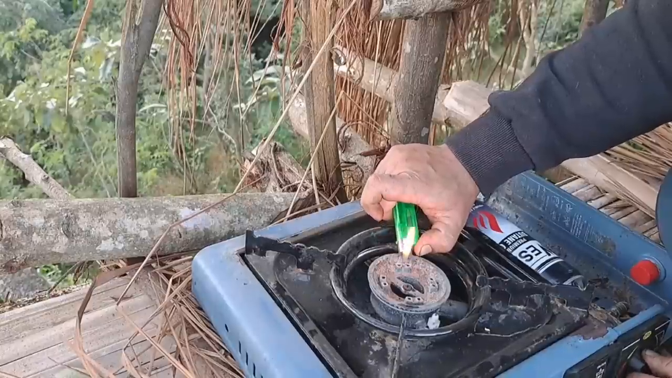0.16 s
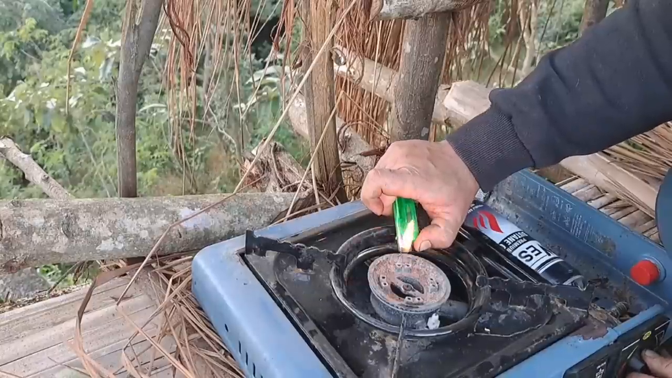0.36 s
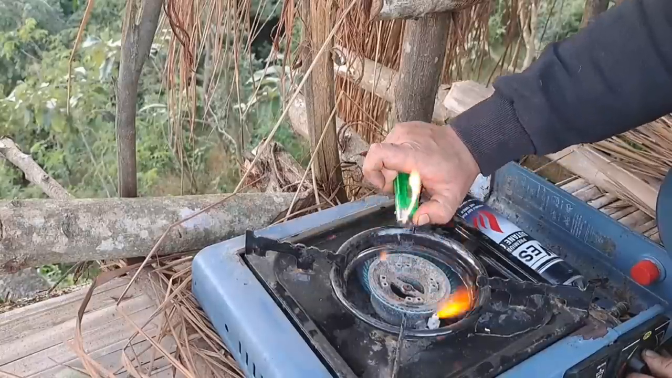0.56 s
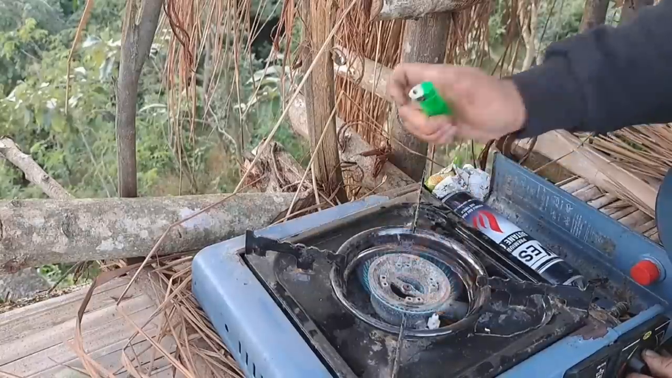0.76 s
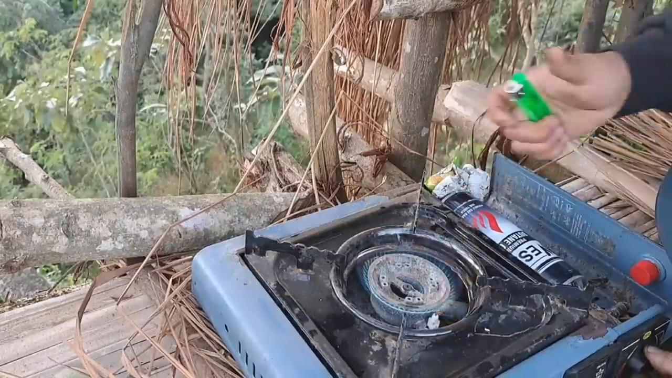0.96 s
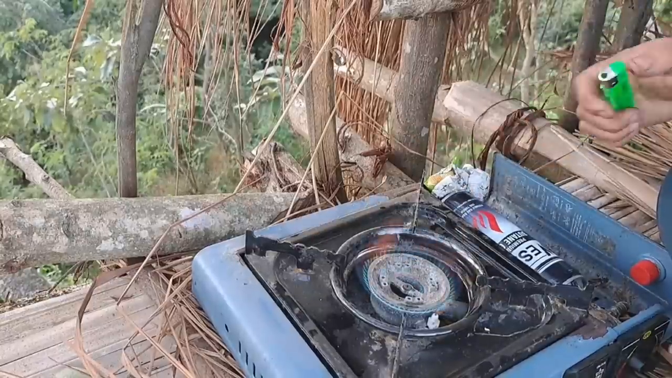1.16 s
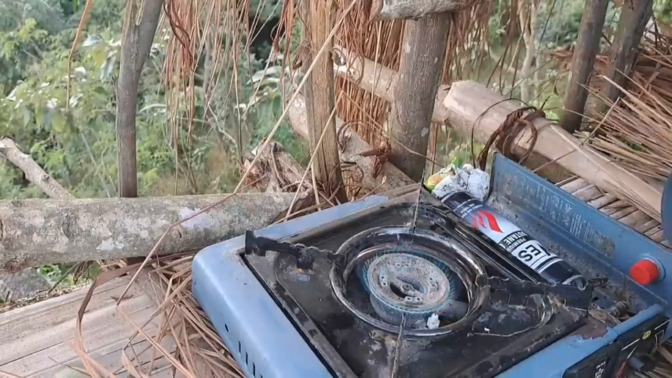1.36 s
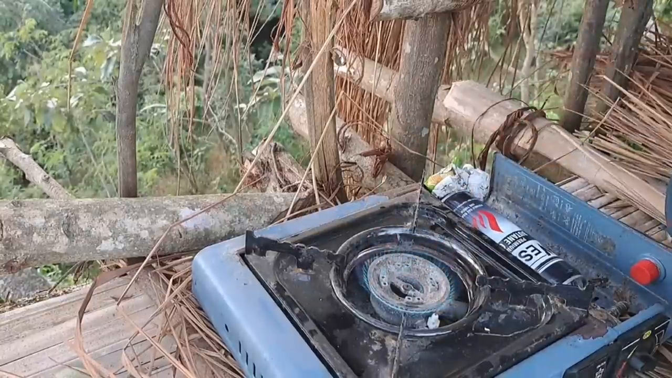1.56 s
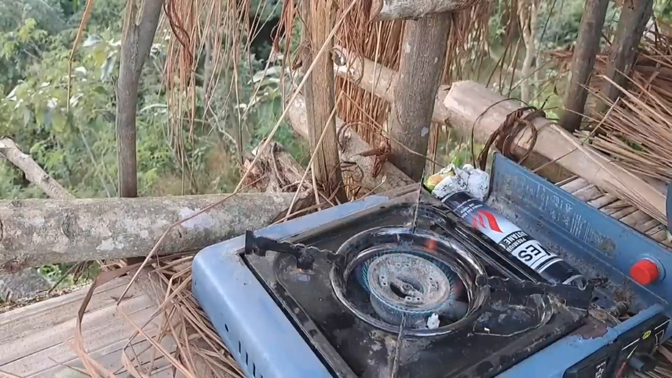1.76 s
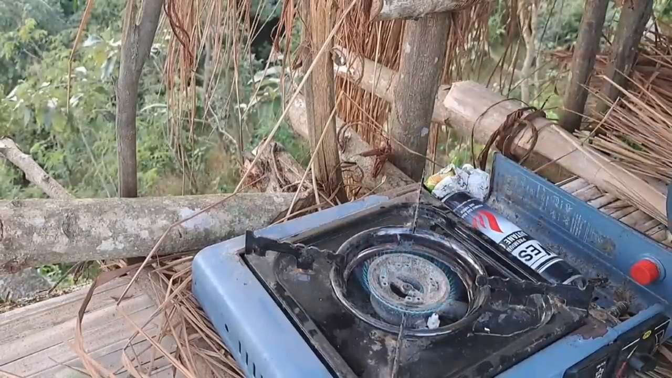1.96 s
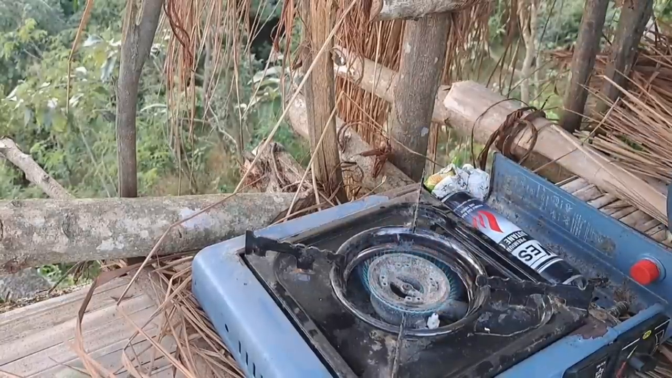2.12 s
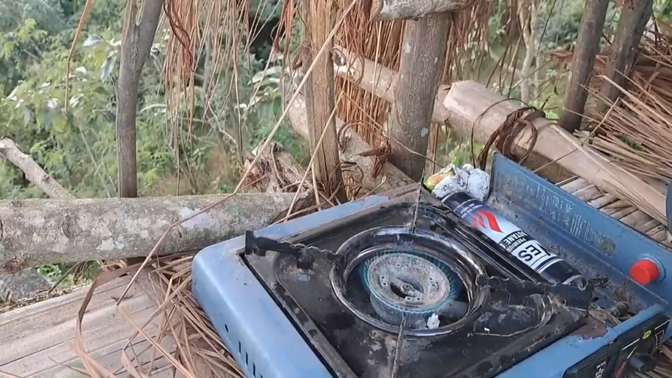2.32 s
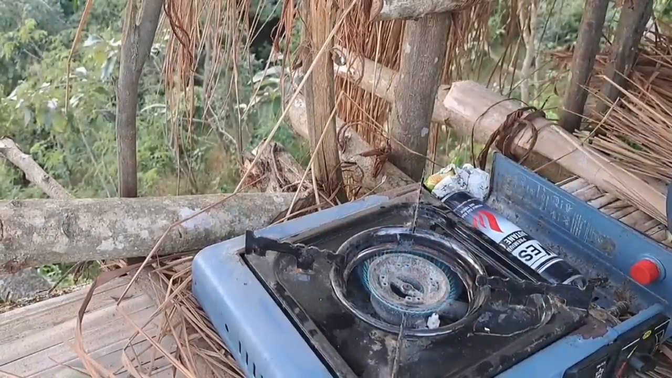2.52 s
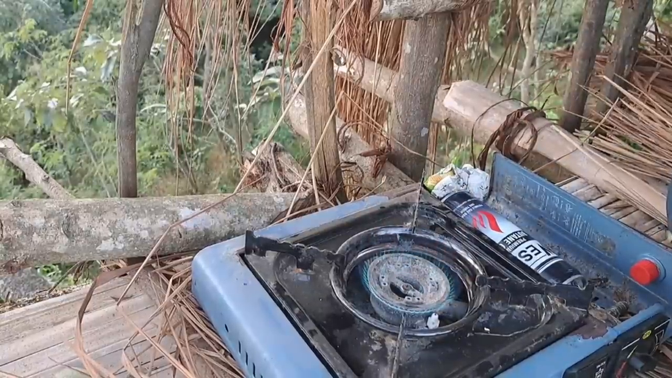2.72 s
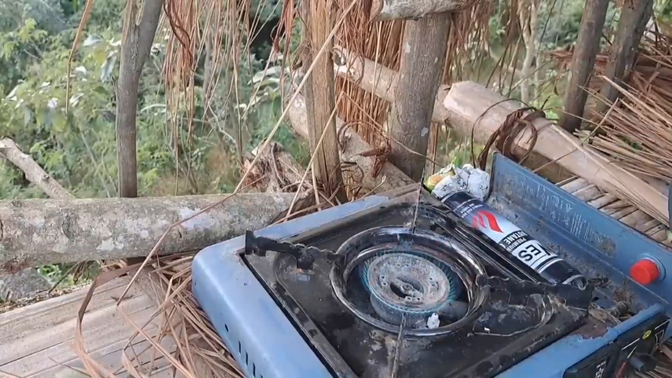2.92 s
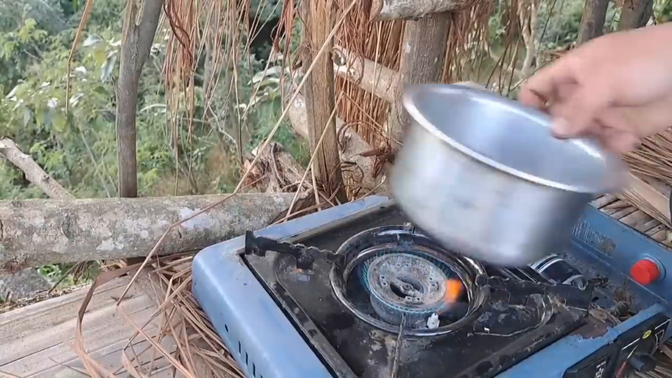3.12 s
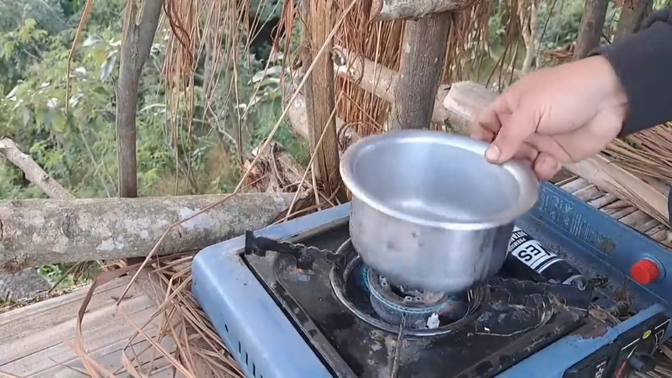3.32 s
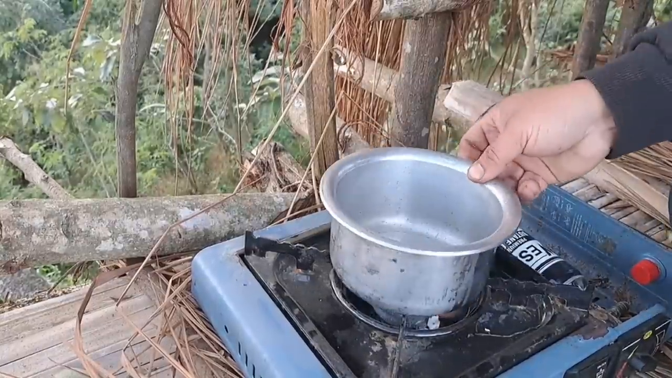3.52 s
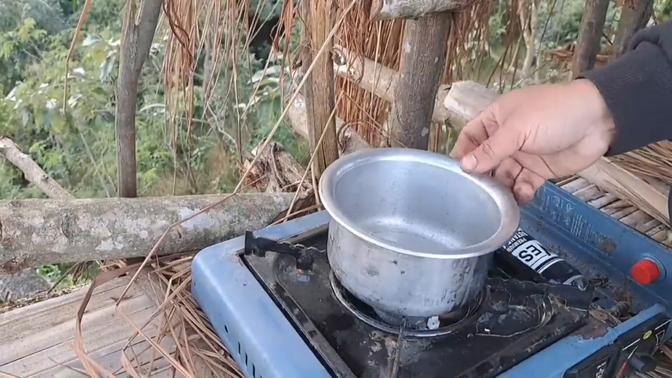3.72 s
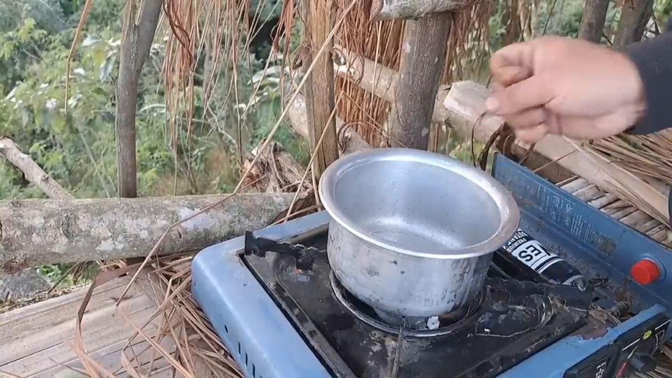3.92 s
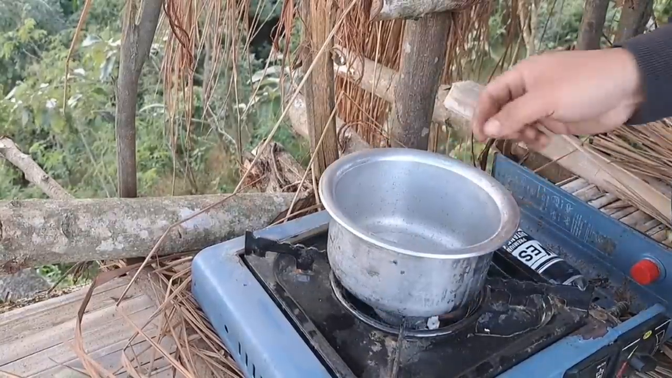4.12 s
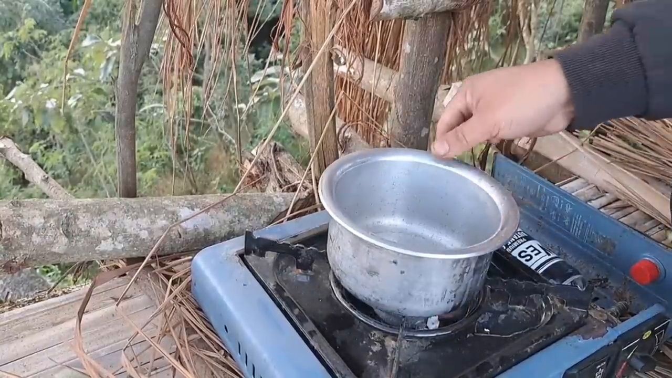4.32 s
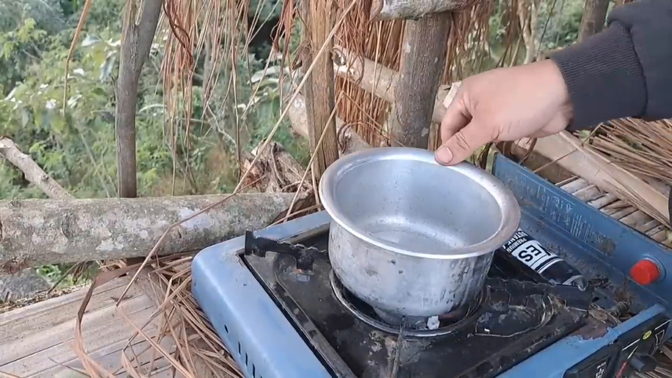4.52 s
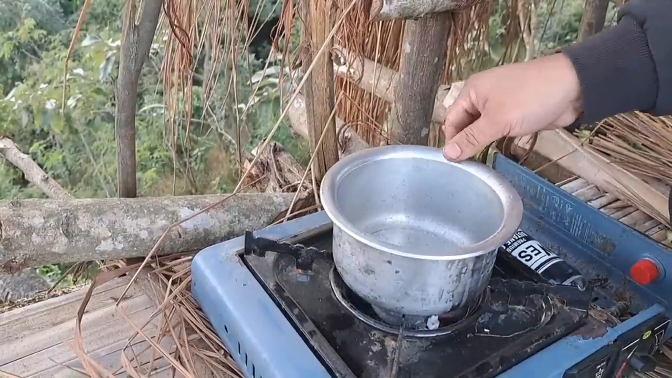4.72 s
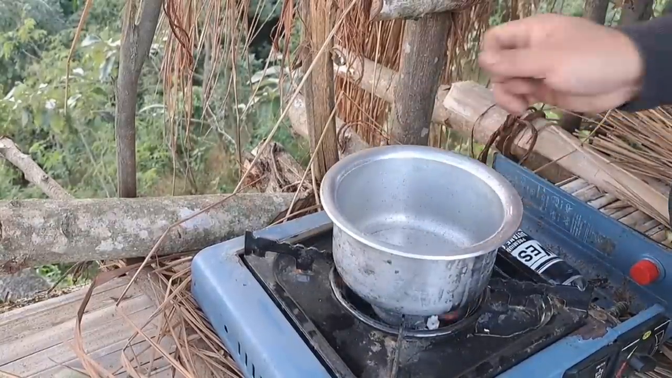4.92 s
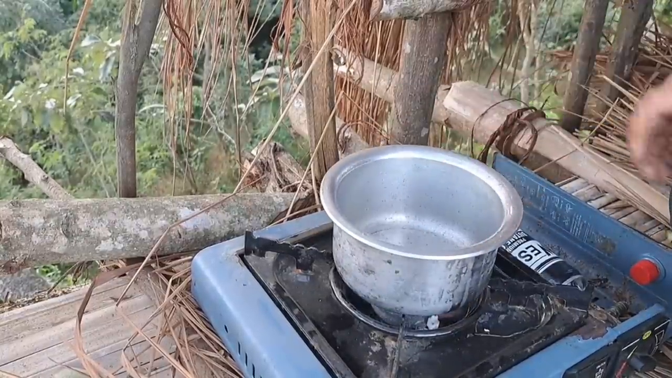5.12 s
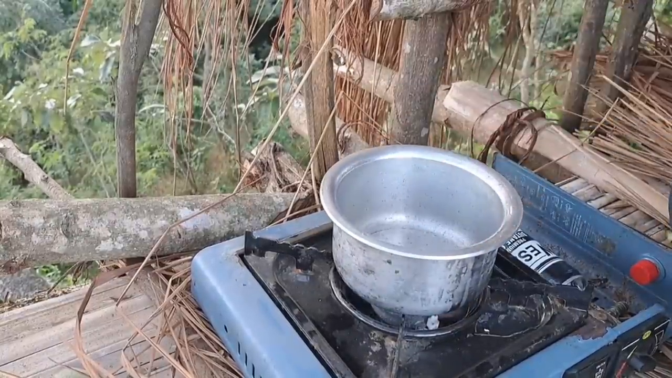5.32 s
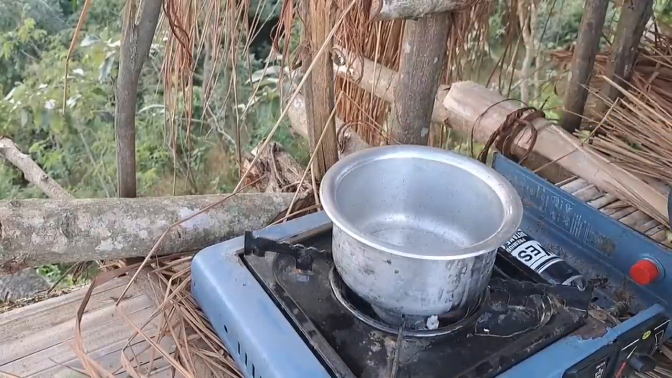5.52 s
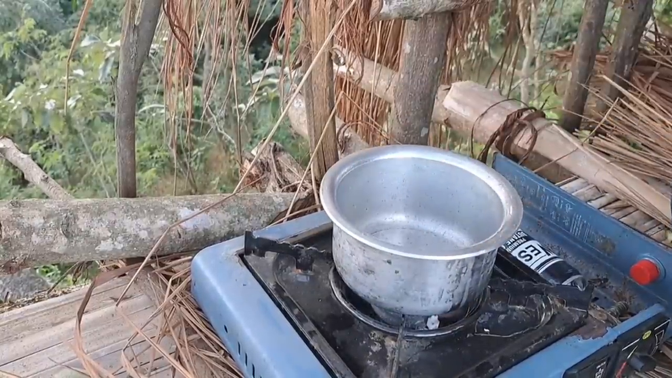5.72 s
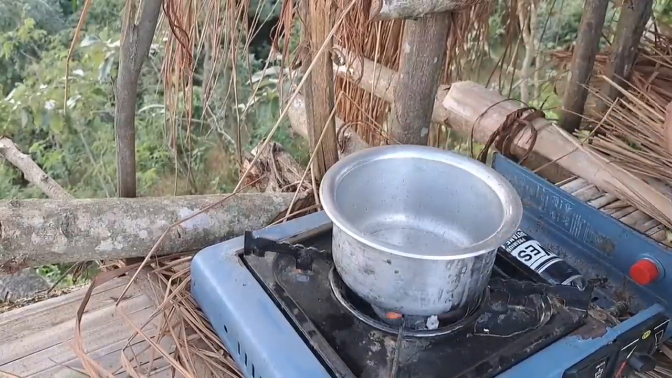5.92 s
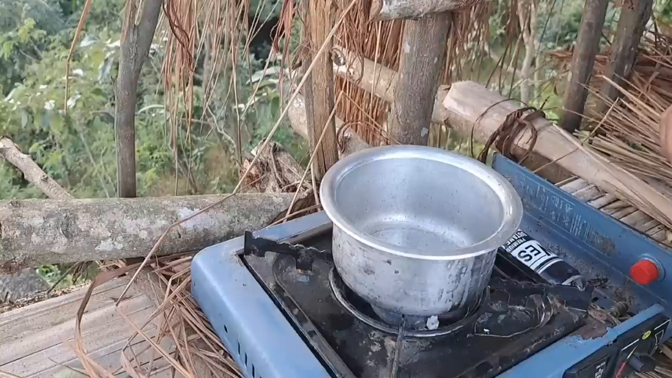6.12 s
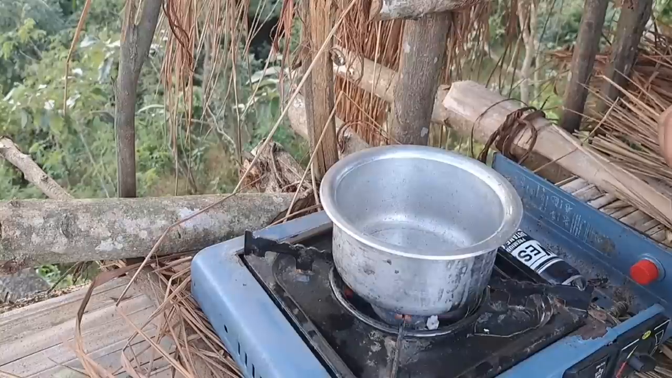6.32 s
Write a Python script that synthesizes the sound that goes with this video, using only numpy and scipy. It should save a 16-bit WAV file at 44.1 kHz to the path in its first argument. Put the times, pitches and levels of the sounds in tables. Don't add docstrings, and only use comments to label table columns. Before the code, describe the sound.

Close stereo view of a gas camping stove in an open forest hut. A lighter wheel rasps, gas catches with two dull puffs, and the flame flutters low and unsteadily. Sleeves and dry straw rustle and tick. A thin aluminium pot lands on the steel grate in a loud, rattling cluster, later gets a shorter nudge, then sits over the soft flame. Very faint insects and leaf hush lie far behind.

```python
import sys
import numpy as np
from scipy import signal
from scipy.fft import rfft, irfft, next_fast_len
from scipy.io import wavfile
from scipy.ndimage import uniform_filter1d

SR = 44100
rng = np.random.default_rng(int(sys.argv[2]) if len(sys.argv) > 2 else 0)


def unload_wav(signal):
    wavfile.write(
        sys.argv[1],
        SR,
        np.round(np.clip(np.atleast_2d(signal).T, -1, 1) * 32767).astype(np.int16),
    )


def convert_level_to_amplitude(level_db):
    exponent = np.asarray(level_db, float) / 20
    return 10 ** exponent


N = 285327
TIME = np.arange(N) / SR

# [t/s, level/dB]
FLAME_LEVEL = [(.57, -65), (1.33, -67), (1.42, -55.5), (2.12, -54.5), (2.2, -72.5), (2.26, -73.5),
               (2.5, -64), (2.68, -58.5), (2.95, -62), (3.12, -63.5), (3.38, -68.5), (3.5, -50.5),
               (3.88, -58), (4.08, -56), (4.5, -55.5), (4.66, -59), (5.3, -55.5), (6.0, -58)]
# [f/Hz, density/dB]
FLAME_COLOUR = [(35, -40), (60, -10.5), (184, 3.5), (266, 1.5), (400, -6.5), (463, -7), (571, -15.5),
                (794, -34.5), (968, -24.5), (1400, -42.5), (1820, -49), (3080, -120)]
# [start t/s, length t/s, level/dB]
FLARES = [(0.561, 0.16, -49), (0.742, 0.029, -42.5), (0.803, 0.096, -52), (0.891, 0.077, -53.5),
          (1.15, 0.077, -71.5), (2.092, 0.049, -59.5), (2.276, 0.065, -56.5), (2.424, 0.038, -60),
          (3.16, 0.068, -56), (3.49, 0.065, -48.5), (3.663, 0.085, -45.5), (4.275, 0.11, -58),
          (4.741, 0.21, -55.5), (6.404, 0.073, -84)]
# [start t/s, length t/s, level/dB]
GUSTS = [(0.578, 0.1, -48.5), (0.742, 0.034, -47), (0.817, 0.054, -64.5), (1.18, 0.05, -78.5),
         (1.5, .1, -65.5), (2.067, 0.12, -61), (2.283, 0.05, -58.5), (2.83, .06, -68), (3.07, 0.1, -57.5),
         (3.502, 0.11, -65.5), (3.69, 0.051, -58.5), (4.483, .06, -57.5), (4.853, 0.11, -67.5),
         (5.41, 0.038, -70), (6.138, 0.21, -58.5), (6.358, 0.096, -65.5)]
# [t/s, peak level/dB, f/Hz]
GAS_POPS = [
    (0.691, -28, 149),
    (0.713, -33, 296),
    (1.461, -35.5, 149),
    (2.057, -36.5, 224),
    (2.122, -33, 235),
    (2.3, -49.5, 206),
    (5.555, -53, 155),
    (5.68, -33.5, 232.6),
]
# [f/Hz, width/octaves, level/dB]
LIGHTER_BODY = [(776, .2, -5.5), (1000, .15, -8.5), (1247, .12, -8), (1500, 0.12, -2), (3380, 0.085, -12.5),
                (4800, .06, -7), (7290, .08, -13)]
# [t/s, peak level/dB, hardness f/Hz, left minus right level/dB]
POT_BLOWS = [(3.513, -17, 1540, -4), (3.519, -24, 1900, -3.5), (3.5289, -17, 1080, -7),
             (3.534, -22.5, 1400, -4), (3.584, -35, 3300, -12.5), (3.611, -25, 1070, -5),
             (3.622, -27, 1460, 1), (3.636, -10, 1650, -3.5), (3.641, -15, 1550, -4.5),
             (3.675, -10.5, 1280, -3.5), (3.6783, -10.5, 1430, -3.5), (3.682, -13, 1240, -1.5),
             (3.694, -26, 1800, -4.5), (3.704, -18.5, 398, 0), (3.7033, -15, 1684, -6),
             (3.709, -19, 2050, -1.5), (3.718, -19, 1828, -6.5), (3.7225, -23, 1000, -4),
             (3.738, -31, 500, -7), (3.806, -35, 1000, -4), (3.812, -40, 900, -7), (4.534, -44.5, 952, -3),
             (4.672, -42.5, 1000, -4), (4.774, -34, 720, -1.5), (4.811, -15, 1540, 2),
             (4.8154, -12, 2620, -7.5), (4.822, -16, 1530, 1), (4.833, -21.5, 1600, -5),
             (4.838, -22, 1450, -2.5), (4.846, -22, 1900, -5.5), (4.883, -23.5, 1070, -3.5),
             (4.888, -32.5, 1700, -4.5), (4.954, -51, 3000, -3.5)]
# [t/s, peak level/dB, hardness f/Hz, left minus right level/dB]
POT_SLIDES = [
    (3.544, -33.5, 1533, -3),
    (3.576, -31, 1540, -2),
    (3.59, -40, 3230, -7),
    (3.65, -35.5, 1418, -4),
    (3.733, -40.5, 636, -2),
    (4.555, -50.5, 622, 0),
    (4.745, -47, 595, -3),
    (4.77, -42.5, 3550, -9.5),
    (4.758, -45.5, 1500, -4.5),
    (4.949, -55.5, 610, -3.5),
]
# [f/Hz, level/dB, t60/s]
POT_MODES = [(647, -5, 0.2), (793, -1.5, 0.099), (1000, -8, 0.1), (1104, -2, 0.11), (1190, -2.5, 0.07),
             (1380, -12.5, 0.091), (1419, -1.5, 0.14), (1540, -5.5, .12), (1630, -1, 0.14),
             (1803, -6.5, 0.14), (1830, 0, .15), (1874, -8, 0.12), (2405, -12, 0.041), (2376, -9, 0.16),
             (2560, -12.5, 0.12), (2657, -8.5, 0.18), (2710, -12.5, 0.16), (3128, -10, 0.068),
             (3320, -14.5, .1), (3150, -15, 0.076), (3506, -5.5, 0.14), (3550, -15, 0.21),
             (3840, -24.5, 0.12), (4130, -18, 0.09), (4200, -14.5, 0.069), (4500, -22, 0.085),
             (4730, -25.5, .08), (5485, -22.5, 0.085), (5930, -22.5, 0.12), (6450, -25, 0.1),
             (6950, -27, 0.1), (8030, -17, 0.2)]
# [f/Hz, level/dB, t60/s]
PRONG_MODES = [(673.5, -17.5, 0.11), (1433, -8, 0.12), (1587, -8, .09), (2045, -5, .11), (2092, -5, .1),
               (2412, -10, .08), (3020, -12, .08), (3330, -15, 0.11), (3550, -14.5, 0.13),
               (4180, -16.5, 0.096), (4580, -20, 0.069), (5330, -16.5, 0.098), (5960, -21.5, 0.064),
               (6890, -20.5, .08)]
# [f/Hz, density/dB]
SHEET_COLOUR = [(59, -47.5), (100, -24.5), (811, 0), (942, -10.5), (1410, -7.5), (2030, -10), (2210, -12),
                (3120, -9), (4580, -17.5), (5430, -19.5), (8200, -23), (9200, -37.5), (10600, -24.5),
                (13900, -31), (16500, -49.5)]
# [t/s, peak level/dB]
TREMORS = [(3.875, -54), (3.905, -61), (3.997, -60.5), (4.11, -59.5), (4.19, -59), (4.25, -64.5),
           (4.305, -55), (4.34, -54), (4.37, -56), (4.41, -60.5), (4.69, -53), (5.055, -59.5),
           (5.11, -58.5), (5.31, -49.5), (5.335, -50.5), (5.38, -52.5), (5.4, -48), (5.44, -58.5),
           (5.47, -58), (5.76, -57.5)]
# [f/Hz, width/octaves, level/dB]
HISS_BANDS = [(1400, 0.13, -78), (3030, 0.43, -77), (4670, 0.06, -81.5), (5630, .05, -80.5)]
# [start t/s, length t/s, swish level/dB, low rub level/dB, left minus right level/dB]
STROKES = [(0.506, 0.17, -68, -67, -3.5), (0.82, 0.11, -67.5, -65, -4.5), (1.094, 0.1, -67.5, -84, -8.5),
           (1.374, 0.12, -67, -67, -7), (1.58, 0.15, -86, -68.5, -5), (1.602, 0.058, -76.5, -83, -13),
           (1.699, 0.055, -76, -86.5, -12.5), (1.82, 0.092, -74, -86.5, -13), (1.97, 0.07, -67, -84.5, -10),
           (1.866, 0.19, -84.5, -67, -4.5), (2.072, 0.078, -63, -79, -12.5), (2.269, 0.12, -60, -78, -7),
           (2.518, 0.044, -69, -95, -11), (2.603, 0.11, -87.5, -74, -3), (2.73, 0.11, -63.5, -92, -10),
           (2.978, 0.23, -71, -73.5, -3), (3.497, 0.1, -54.5, -69.5, -4), (3.623, 0.18, -70.5, -60, 0.5),
           (3.797, 0.044, -83.5, -71.5, -2.5), (4.062, 0.13, -76.5, -83.5, -8),
           (4.26, 0.22, -87.5, -78, 3.5), (3.553, 0.049, -64.5, -74.5, -2),
           (4.63, 0.12, -70.5, -58.5, -3.5), (4.724, 0.13, -57.5, -59, -1),
           (5.172, .29, -57.5, -69.5, -7.5), (5.525, 0.19, -67, -70.5, -10),
           (5.788, 0.22, -63.5, -74.5, -3), (6.164, 0.064, -83, -69.5, -4)]
# [f/Hz, density/dB]
CLOTH_COLOUR = [(1760, -11), (3000, -7.5), (4380, -9.5), (4760, -2.5), (5140, -3), (6450, -4.5),
                (7410, -2.5), (8920, -13.5), (12400, -3.5), (14900, -9.5), (15600, -5)]
# [t/s, peak level/dB, colour f/Hz, left minus right level/dB]
SNAPS = [(0.668, -52.5, 1170, -2), (0.7123, -51.5, 990, -1.5), (0.752, -50.5, 940, -2.5),
         (0.8733, -38.5, 6700, -4), (0.892, -58, 1600, 1), (0.874, -47.5, 2676, -8),
         (0.602, -55.5, 1300, -1), (0.64, -59, 1203, 1), (0.764, -55, 897, -1), (0.85, -57.5, 1100, 1),
         (0.946, -60, 1305, -4), (1.452, -51.5, 2700, -2), (2.795, -54, 13000, -6), (2.835, -51, 12500, -6),
         (2.318, -47, 12010, -8), (1.452, -39, 9470, -4.5), (1.618, -53.5, 14000, -3),
         (1.628, -51, 9000, -2), (1.792, -52, 12430, -4.5), (1.832, -55.5, 900, -1.5),
         (1.883, -51, 9020, -7.5), (1.988, -51.5, 12180, -6), (2.02, -50, 6300, -6),
         (2.058, -55.5, 12500, -4), (2.072, -51, 9000, -4.5), (2.106, -49.5, 12010, -5.5),
         (2.141, -48, 11040, -4), (5.799, -51, 13500, -3.5), (2.1234, -47.5, 6600, -7),
         (2.28, -50, 12200, -9.5), (2.305, -39.5, 7000, -8.5), (2.322, -56.5, 6100, -19),
         (2.383, -49, 4460, -13.5), (2.7443, -59.5, 1800, -18.5), (2.806, -44, 12600, -6),
         (2.857, -50.5, 6540, -3.5), (2.9422, -53.5, 6020, -6.5), (3.0363, -44.5, 1660, -5),
         (3.195, -49, 1980, -5), (4.021, -53, 900, -1), (4.5217, -47.5, 6760, -3.5),
         (5.284, -52.5, 1960, -10), (5.557, -51, 1750, -3), (5.5858, -49.5, 1900, -7.5),
         (5.678, -50.5, 1215, 5.5), (5.8073, -47, 6260, -7), (6.177, -53, 1020, -4),
         (6.195, -62, 1500, -4.5), (6.21, -56, 1100, -4.5), (6.225, -62, 2600, -3), (6.25, -60, 1780, -4.5),
         (6.27, -61, 1200, -2), (6.405, -62.5, 2600, -5), (6.065, -60, 2500, 0)]
# [t/s, length t/s, f/Hz, level/dB]
SQUEAKS = [(2.215, .045, 12050, -64), (2.215, .04, 4100, -75), (2.215, .04, 13400, -71),
           (2.22, .04, 5100, -73), (2.22, .04, 6200, -73), (2.095, .025, 4200, -70),
           (2.095, .02, 6250, -71), (2.33, .025, 4100, -68), (2.385, .03, 5000, -68),
           (2.37, .05, 2600, -75), (2.39, .07, 2750, -75), (2.36, .03, 4150, -73), (2.35, .03, 5200, -74),
           (2.31, .03, 6100, -66), (2.83, .03, 5500, -72), (2.82, .08, 1800, -76), (2.76, .06, 1800, -74),
           (2.76, .05, 2550, -75), (2.75, .05, 3350, -73), (2.75, .04, 6100, -76), (5.283, .012, 4750, -60),
           (6.27, .04, 5400, -74), (5.65, .13, 4300, -76), (5.62, .04, 14100, -72)]
# [start t/s, end t/s, rate/per s, lowest f/Hz, highest f/Hz]
CHIRP_SWARMS = [
    (3.9, 5.2, 60, 2700, 3600),
    (4.0, 4.35, 40, 11000, 14000),
    (5.51, 5.77, 330, 11300, 14400),
    (2.0, 2.9, 90, 1700, 6300),
]
CHIRP_DB = (-75, -73, -73, -75)
CHIRP_S = (.005, .015, .012, .02)
# [f/Hz, width f/Hz, level/dB]
INSECTS = [(1532, 140, -14), (1900, 120, -16.5), (3300, 120, -26.5), (5375, 200, -10), (6700, 140, -21),
           (7400, 150, -10.5), (8500, 210, -19.5), (13200, 500, -16), (14800, 490, -16)]
# [f/Hz, density/dB]
FOREST_COLOUR = [(12, -37), (20, 5), (93, -2), (748, -18), (1880, -18), (2280, -18.5), (3400, -17.5),
                 (4100, -22), (4900, -8), (6050, -13.5), (7150, -7), (9190, -19), (13200, -12),
                 (15600, -19.5)]
# [f/Hz, level/dB]
MIC_RESPONSE = [(20, 0), (15000, 0), (15450, -4), (15750, -32), (16600, -44)]


def unit(x):
    return x / np.sqrt(np.mean(x ** 2))


def shape(x, gain):
    size = next_fast_len(x.shape[-1], True)
    hz = np.maximum(np.arange(size // 2 + 1) * SR / size, 1)
    return irfft(rfft(np.float32(x), size) * np.float32(gain(hz)), size)[..., :x.shape[-1]]


def tint(x, points):
    hz, db = np.transpose(points)
    return shape(x, lambda f: convert_level_to_amplitude(np.interp(np.log(f), np.log(hz), db)))


def hump(x, hz, width):
    return shape(x, lambda f: np.exp(-(np.log2(f / hz) / width) ** 2))


def walk(rate):
    k = int(SR / 64 / rate)
    held = np.repeat(rng.standard_normal(N // 64 // k + 2), k)
    slow = uniform_filter1d(uniform_filter1d(held, k), k)
    return np.interp(TIME, np.arange(len(slow)) * 64 / SR, unit(slow))


def swells(table, gains, attack_s, release_s):
    s, length = np.transpose(table)[:2, :, None]
    t = TIME[::64]
    rise = np.clip((t - s) / attack_s, 0, 1)
    total = gains @ (rise * np.exp(-np.maximum(t - s - length, 0) / release_s))
    return np.array([np.interp(TIME, t, row) for row in np.atleast_2d(total)])


def pair(size, apart):
    mid, side = rng.standard_normal((2, size))
    return np.array([mid + apart * side, mid - apart * side])


def lean(db):
    return convert_level_to_amplitude(np.array([db, -db]) / 2)


def add(out, s, x):
    i = int(s * SR)
    out[:, i:i + x.shape[1]] += x[:, :N - i]


def flame():
    s, level_db = np.transpose(FLAME_LEVEL)
    steady_db = np.interp(TIME, s, level_db) - 28 * np.clip(TIME - 6.04, 0, .27)
    flares = swells(FLARES, convert_level_to_amplitude(np.transpose(FLARES)[2]), 0.032, 0.006)[0]
    roar = np.hypot(convert_level_to_amplitude(steady_db), flares)
    under_pot = np.clip((TIME - 3.7) / 0.15, 0, 1) * (TIME < 6.3)
    lit = np.clip((TIME - .578) / 0.0029, 0, 1)

    tongue_db = -5.5 + 0.77 * (steady_db + 56) + 0.5 * under_pot
    gas = unit(tint(pair(N, 1 / 7), FLAME_COLOUR))
    flap = walk(22)
    burning = 0
    for hz in 70 * 2 ** np.arange(0, 4.6, .5):
        tongue_share = np.clip(np.log2(hz / 300), 0, 1)
        band_db = tongue_share * (np.minimum(tongue_db, 3) + 9) + 1.6 * flap + 1.6 * walk(14)
        burning = burning + hump(gas, hz, .4) * convert_level_to_amplitude(band_db)

    gusts = swells(GUSTS, convert_level_to_amplitude(np.transpose(GUSTS)[2]), 0.029, 0.012)[0] + convert_level_to_amplitude(-20) * roar
    draught = unit(hump(pair(N, 1 / 3), 54, 0.26)) * gusts * convert_level_to_amplitude(-4.5 + 0.87 * walk(6.4))
    hollow = unit(hump(pair(N, 1 / 5), 546, 0.27)) * convert_level_to_amplitude(-9.0 + 0.6 * walk(2.3)) * under_pot
    fire = roar * convert_level_to_amplitude(0.36 * walk(6.095)) * (burning * convert_level_to_amplitude(-1.5) + hollow)
    return lit * (fire + draught) * lean(-0.59)[:, None]


def pops():
    out, t = np.zeros((2, N)), np.arange(1024) / SR
    for s, db, hz in GAS_POPS:
        push = np.exp(-t * hz * 3.2) * np.clip(t * hz * 3, 0, 1) ** 2
        swing = np.sin(2 * np.pi * 1.08 * hz * t) * push
        add(out, s, np.outer(lean(-1.2), swing / swing.max()) * convert_level_to_amplitude(db - 5.0))
    return out


def lighter():
    out, t = np.zeros((2, N)), np.arange(4096) / SR
    grit = pair(len(t), 0.65) * convert_level_to_amplitude(3.0 * rng.standard_normal(len(t)))
    scratch = convert_level_to_amplitude(-9) * unit(hump(grit, 2000, 1.2)) * 1000 ** (-t / 0.35)
    for hz, width, db in LIGHTER_BODY:
        t60 = np.clip(0.15 * 1500 / hz, .08, .2)
        scratch = scratch + unit(hump(grit, hz, width)) * convert_level_to_amplitude(db) * 1000 ** (-t / t60)
    add(out, .5185, scratch * (t < .07) * convert_level_to_amplitude(-56.0) * lean(-1.5)[:, None])
    return out


def ring_metal(t):
    hz, mode_db, t60 = np.float32(np.transpose(POT_MODES + PRONG_MODES)[:, :, None])
    is_pot = np.arange(len(hz)) < len(POT_MODES)
    loose = is_pot[:, None]
    spot, side, turn = np.float32(rng.standard_normal((3, len(hz), 1)))
    pitch = hz * (1 + 0.006 * loose * side)
    decay = 1000 ** (-t / (np.where(loose, .48, 1) * np.clip(t60, .08, .2)))
    modes = convert_level_to_amplitude(mode_db + 3.0 * spot) * np.sin(2 * np.pi * pitch * t + 1.15 * turn) * decay
    stereo = np.array([(1 + k * 0.25 * side) * modes for k in (1, -1)])
    return stereo[:, is_pot].sum(axis=1), stereo[:, ~is_pot].sum(axis=1)


def strike(db, colour_hz, sharp, chatter_s, ring_share):
    t = np.arange(6144) / SR
    n = 2560
    contacts = .22 * (rng.random(len(t)) < 700 / SR) * rng.standard_normal(len(t)) * np.exp(-t / chatter_s)
    contacts[0] = sharp
    burst = contacts[None, :n]
    rings, prongs = ring_metal(np.float32(t[:n]))

    fade = 0.75 * 1000 ** (-t / 0.033) + 1000 ** (-t / 0.094) + 0.0034 * 1000 ** (-t / 0.83)
    sheet = tint(pair(len(t), 2 / 5), SHEET_COLOUR) * fade
    padded = np.pad(rings, ((0, 0), (0, len(t) - n)))
    body = ring_share * unit(padded) + (1 - ring_share) * unit(sheet)
    blow = signal.fftconvolve(np.float32(body), np.float32(burst), axes=1)[:, :len(t)]
    colour = signal.butter(1, [0.77 * colour_hz, 1.16 * colour_hz], "band", fs=SR)
    blow = np.clip(0.63 + db / 42, .03, 1) * blow + signal.lfilter(*colour, blow)
    blow = blow / np.abs(blow).max()

    clear = signal.fftconvolve(prongs, burst, axes=1)[:, :n] / np.abs(prongs).max()
    blow[:, :n] += convert_level_to_amplitude(-9) * np.clip(1.7 + db / 36, .05, 1) * clear
    blow += convert_level_to_amplitude(-4) * sharp * np.sin(2 * np.pi * 1.1 * colour_hz * t) * np.exp(-t * colour_hz * 1.1)
    crack = np.diff(pair(512, .8), 2) * 1000 ** (-t[:510] / .012)
    blow[:, :510] += convert_level_to_amplitude(-31) * sharp * np.clip(1.5 + db / 26, 0, 1) * crack
    blow = signal.lfilter(*signal.butter(2, 250, "high", fs=SR), blow)
    blow[0] = np.roll(blow[0], 1)
    return blow / np.abs(blow).max()


def pot():
    out = np.zeros((2, N))
    for table, sharp, chatter_s, ring_share in ((POT_BLOWS, 1.23, 0.009, 0.48), (POT_SLIDES, 0.11, 0.025, 0.5)):
        for s, db, colour_hz, pan_db in table:
            blow = strike(db, colour_hz, sharp, chatter_s, ring_share)
            add(out, s, blow * convert_level_to_amplitude(db - 1.8) * lean(pan_db)[:, None])
    return out


def tremors():
    out, t = np.zeros((2, N)), np.arange(4096) / SR
    for s, db in TREMORS:
        noise = pair(len(t), 0.72)
        tap = hump(noise, 1400, 0.58) + 0.31 * hump(noise, 3070, 0.25)
        tap = tap * 1000 ** (-t / 0.039)
        add(out, s, tap / np.abs(tap).max() * convert_level_to_amplitude(db) * lean(-1)[:, None])
    return out


def gas_hiss():
    out = np.zeros((2, N))
    resting = np.clip((TIME - 3.78) / 0.091, 0, 1) * np.clip((6.3 - TIME) / 0.44, 0, 1)
    for hz, width, db in HISS_BANDS:
        out += unit(hump(pair(N, 0.93), hz, width)) * convert_level_to_amplitude(db + 2.5 * walk(25)) * resting * lean(-2.5)[:, None]
    return out


def rustle():
    rows = np.array(STROKES + [(1.2, 6.1 - 1.2, -75.5, -84, -6.5)])
    sides = lean(rows[:, 4])
    swish_level = swells(rows, sides * convert_level_to_amplitude(rows[:, 2] + 0.83), 0.048, 0.043)
    rub_level = swells(rows, sides * convert_level_to_amplitude(rows[:, 3] + 0.83), 0.048, 0.043)
    grain_db = np.minimum(3 * rng.exponential(size=(2, N)), 12)
    grains = (rng.random((2, N)) < 900 / SR) * convert_level_to_amplitude(grain_db)
    swish = unit(tint(pair(N, 1.0) * (1 + 1.4 * grains), CLOTH_COLOUR)) * convert_level_to_amplitude(1.7 * walk(28) + 1.9 * walk(8))
    rub = unit(hump(pair(N, 0.76) * (1 + 5.7 * grains[0]), 1200, 1.0)) * convert_level_to_amplitude(-5.5 + 2.3 * walk(30))
    return convert_level_to_amplitude(-0.5) * swish * swish_level + rub * rub_level


def ticks():
    out, t = np.zeros((2, N)), np.arange(4096) / SR
    for s, db, hz, pan_db in SNAPS:
        noise = pair(len(t), 0.92)
        decay = 1000 ** (-t / 0.046 * np.clip(hz / 5000, 1, 2))
        snap = (hump(noise, hz, 0.62) + 0.25 * hump(noise, 3300, 3.3)) * decay
        add(out, s, snap / np.abs(snap).max() * convert_level_to_amplitude(db + 1.0) * lean(pan_db)[:, None])
    return out


def squeaks():
    out, t = np.zeros((2, N)), np.arange(-4096, 4096) / SR
    for s, length, hz, db in SQUEAKS:
        tone = unit(hump(pair(len(t), 0.19), hz, 0.022))
        add(out, s + t[0], tone * np.exp(-(t / length * 2) ** 2) * convert_level_to_amplitude(db))
    return out


def chirps():
    out, t = np.zeros((2, N)), np.arange(-1024, 1024) / SR
    for (start, end, rate, low, high), db, length in zip(CHIRP_SWARMS, CHIRP_DB, CHIRP_S):
        for when, pitch, glide, size, side in rng.random((int(rate * (end - start)), 5)):
            hz = low + (high - low) * pitch
            turns = hz * t * (1 + .022 * (2 * glide - 1) * t / length / 2)
            tone = np.sin(2 * np.pi * turns) * np.exp(-(t / length * 2) ** 2) * convert_level_to_amplitude(db - 8 * size)
            add(out, start + (end - start) * when, np.outer(lean(-4 - 8 * side), tone))
    return out


def forest():
    out = unit(tint(pair(N, 1.0), FOREST_COLOUR)) * convert_level_to_amplitude(-1.0)
    opening = np.clip((.8 - TIME) / 0.13, 0, 1)
    for hz, width, db in INSECTS:
        extra_db = 0.91 * (hz > 5000) + 3.5 * (5000 < hz < 6000)
        choir = unit(hump(pair(N, 0.56), hz, 1.4 * width / hz))
        out = out + choir * convert_level_to_amplitude(db + 2.4 * walk(3.9) + extra_db * opening)
    return out * convert_level_to_amplitude(-71.5) * lean(-5.5)[:, None]


def scene():
    stove = flame() + pops() + lighter() + pot() + tremors() + gas_hiss()
    return stove + rustle() + ticks() + squeaks() + chirps() + forest()


def roll_off(x):
    return signal.sosfilt(signal.butter(12, 16650, fs=SR, output="sos"), x)


def record(dry):
    return roll_off(tint(dry, MIC_RESPONSE))


dry = scene()
out = record(dry)
unload_wav(out)
```